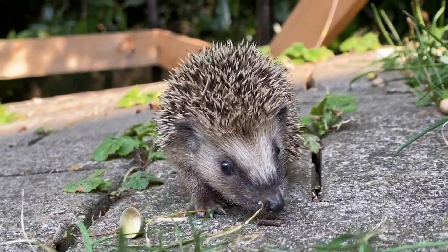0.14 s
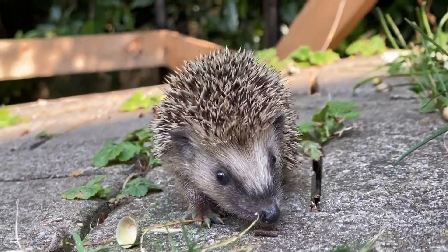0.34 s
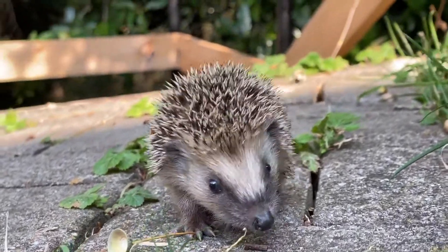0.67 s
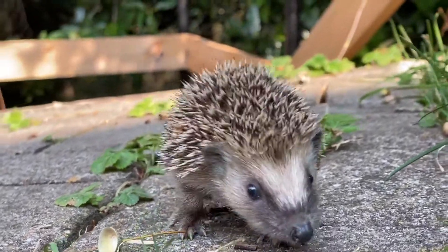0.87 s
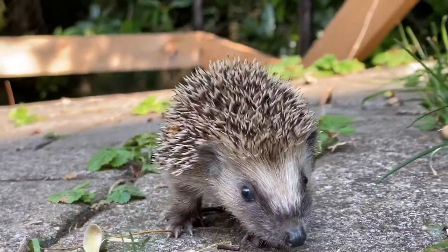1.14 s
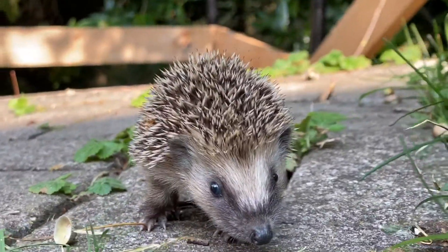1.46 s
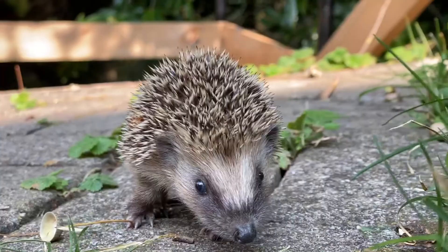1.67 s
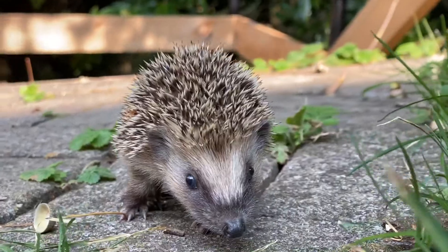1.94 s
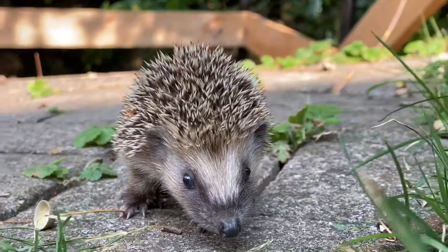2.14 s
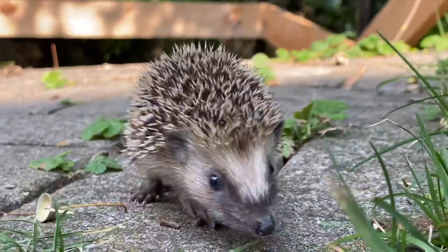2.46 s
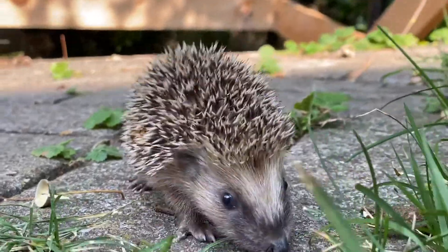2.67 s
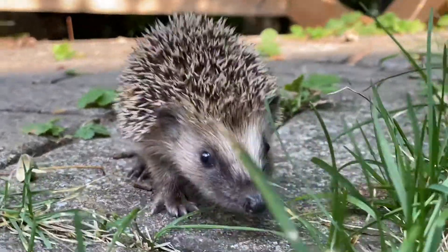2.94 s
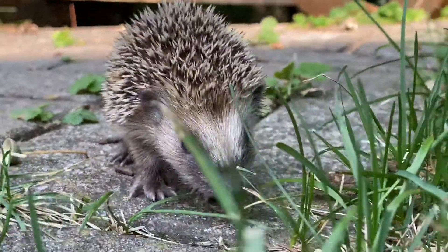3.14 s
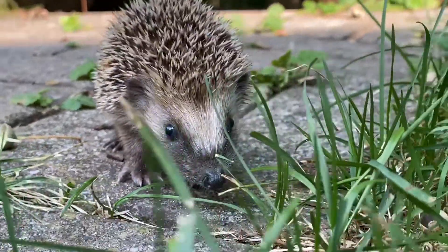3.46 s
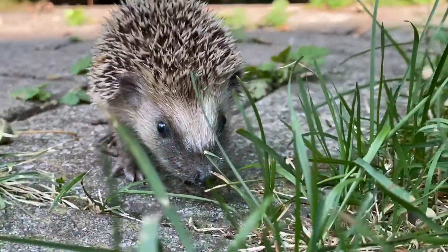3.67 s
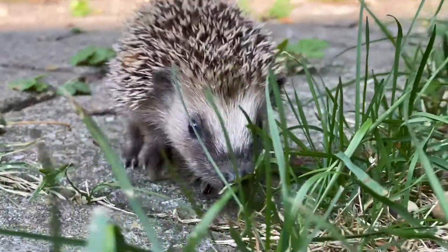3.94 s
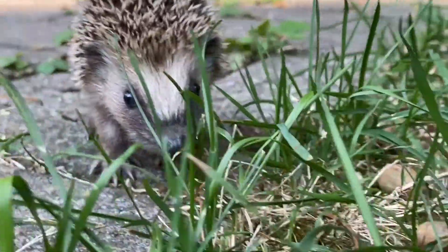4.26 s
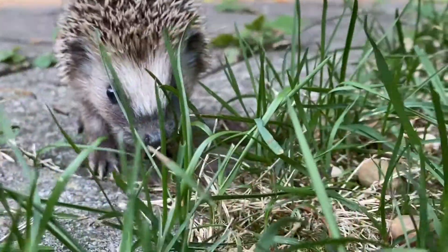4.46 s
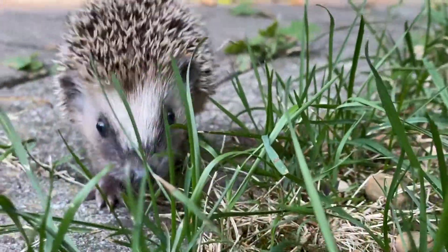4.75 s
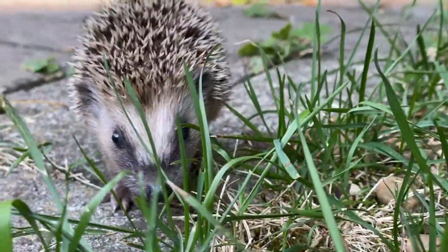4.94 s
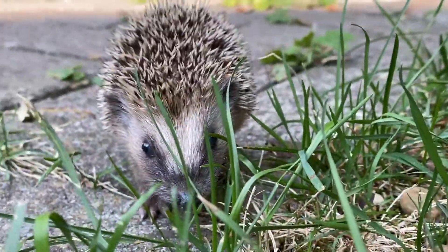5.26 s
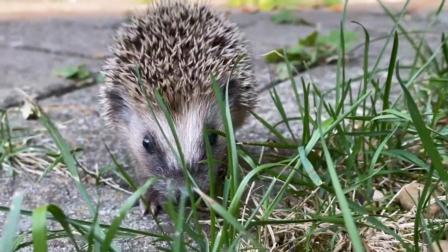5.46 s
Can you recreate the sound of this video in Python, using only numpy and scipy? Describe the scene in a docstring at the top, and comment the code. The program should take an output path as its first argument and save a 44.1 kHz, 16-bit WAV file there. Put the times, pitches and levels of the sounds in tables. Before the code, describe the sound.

Close outdoor stereo pickup of a small hedgehog on paving and grass. A few dry ticks and a faint rustle come first, then four bouts of fast, breathy sniffing puffs with softer indrawn air between many of them. Tiny scuffs accompany the second bout. Far behind, a low engine hum wavers and grows louder over soft rumble and traffic wash.

```python
"""A garden, outdoors: a young hedgehog sniffs its way over paving into grass, close to a two-port microphone.
In four bouts it puffs air out about seven times a second: shaped noise for nostrils, throat and hissing jet.
Softer draws of air lie before many puffs; dry stalks tick, blades rustle and the ground is scuffed, all in
noise bursts. Far off, wavering sine tones make an engine hum that grows louder, over rumble, roar and wash."""
import sys
import numpy as np
from scipy import signal
from scipy.fft import rfft, irfft, next_fast_len
from scipy.io import wavfile
from scipy.ndimage import map_coordinates

SR = 44100
rng = np.random.default_rng(int(sys.argv[2]) if len(sys.argv) > 2 else 0)


def generate_wav(sig):
    """Save sig (samples, or channels by samples) to the path in sys.argv[1] as 16-bit PCM at SR."""
    pcm = np.round(np.clip(np.atleast_2d(sig).T, -1, 1) * 32767).astype(np.int16)
    wavfile.write(sys.argv[1], SR, pcm)


N = 246958

# Spectra below give only the shape: each noise is brought to rms 1 before its level is set.
# low rumble in the distance, its spectrum: freq_hz [Hz], density_db [dB per Hz]
RUMBLE_SPECTRUM = [(30, -26.5), (45, -9), (58, -5.5), (80, -2.5), (115, -2.5), (155, -10.5), (260, -31.5)]
# rumble before panning: time_s [s], level_db [dB]
RUMBLE_LEVEL = [(0, -54), (.7, -54.5), (1.25, -60.5), (2.2, -57.5), (3.0, -54.5), (3.7, -55), (4.15, -51),
                (5.6, -54)]
# the engine's broad roar: freq_hz [Hz], density_db [dB per Hz]
ROAR_SPECTRUM = [(100, -17), (175, 2.5), (205, -1), (250, -3), (320, -7), (420, -7), (520, -16), (700, -30),
                 (1300, -47.5)]
# far traffic: freq_hz [Hz], density_db [dB per Hz]
WASH_SPECTRUM = [(350, -2.5), (560, 4), (800, -6.5), (1300, -16.5), (2200, -35)]
# far traffic swells: time_s [s], half_width_s [s], rise_db [dB]
WASH_SWELLS = [(.68, 0.36, 12), (2.901, .3, 4), (4.698, 0.24, 5.5)]
# faint even hiss: freq_hz [Hz], density_db [dB per Hz]
AIR_SPECTRUM = [(800, 6.5), (1800, 5), (3400, 1), (9000, -3), (12000, -4.5), (13200, -14.5)]
# far sounds, how alike the two ports are: freq_hz [Hz], likeness [-1 to 1]
FAR_ALIKE = [(70, 1), (130, 0.87), (220, 0.68), (330, 0.31), (640, 0.13), (1400, 0.57), (3000, 0.95),
             (7000, 0.89), (9000, 0.053)]
# engine's second order, before panning: time_s [s], level_db [dB]
HUM_LEVEL = [(0, -62), (.8, -56), (1.25, -59.5), (1.7, -56), (2.4, -55.5), (3.2, -48.5), (3.8, -49),
             (4.55, -45.7), (5.25, -51.5), (5.6, -45.5)]
# engine's fourth order, before panning: time_s [s], level_db [dB]
OVERTONE_LEVEL = [(0, -65), (.8, -66.5), (1.3, -70), (1.7, -60), (2.1, -63), (2.35, -74), (2.9, -63.5),
                  (3.55, -62.5), (4.8, -65), (5.3, -68.5)]
# weaker low tones, before panning: pitch_hz [Hz], first_db [dB], last_db [dB]
LOW_TONES = [(64.06, -62.5, -70), (73.6, -66, -58.5), (134.4, -63, -71)]
# engine's higher tones: pitch_hz [Hz], level_db [dB re their common level], left_lead_rad [rad]
MURMUR_TONES = [(343, -4.5, 0.4), (439, -1, 0.6), (559, -17, 1.8), (587, -14.5, 1.3)]
# common level of the higher tones, before panning: time_s [s], level_db [dB]
MURMUR_LEVEL = [(0, -82), (1.0, -79.5), (3.75, -76), (4.35, -68), (4.85, -63.5), (5.6, -68)]
# nose and feet scuff and softly bump the ground: start_s [s], length_s [s], level_db [dB], centre_hz [Hz]
SCUFFS = [(2.519, 0.042, -80.5, 1980), (2.575, 0.051, -79.5, 1250), (2.663, 0.039, -78, 2000),
          (2.707, 0.045, -83.5, 1150), (2.843, 0.032, -76.5, 2250), (5.311, .06, -86.5, 1550),
          (5.456, 0.028, -67.5, 430), (5.506, 0.03, -77, 1170), (5.511, 0.09, -82.5, 1500)]
# grass blades brush, and at 2.353 s a brief bright fizz rides on a draw: start_s [s], length_s [s], level_db
# [dB]
RUSTLES = [(0.0, 0.13, -84), (0.285, 0.044, -91), (0.128, 0.62, -94), (2.353, 0.035, -80),
           (2.832, 0.024, -74), (3.783, 0.025, -78), (5.136, 0.35, -95)]
# dry stalks snap: start_s [s], envelope_peak_db [dB]
TICKS = [(0.0289, -58.5), (0.075, -54.5), (0.102, -57), (0.1075, -59.5), (0.1597, -66), (0.3021, -62)]
# blades and stalks: freq_hz [Hz], density_db [dB per Hz]
BLADE_SPECTRUM = [(6000, -20), (9000, -8.5), (11500, -1.5), (15800, -2.5)]
# near sounds, how alike the two ports are: freq_hz [Hz], likeness [-1 to 1]
NEAR_ALIKE = [(500, 0.78), (1400, 1), (7500, 0.98), (9000, 1)]
# phase by which near sounds lead at the left port: freq_hz [Hz], left_lead_rad [rad]
PORT_LEAD = [(1900, 0.3), (3600, .65), (6000, 0.37), (7700, -1), (8200, 1), (9900, 0.93), (15800, -5)]
# the nose flares, turns and nears the paving:
# time_s [s], resonance [ratio], treble beamed at the microphone [dB], extra puff hiss [dB]
SNOUT = [(1.1, 1.043, -7, -5), (1.7, 1.03, -10, -4), (2.8, 1.03, -10, -1.5), (3.2, 1.017, -17, 0),
         (3.8, 1.01, -1, -5.5), (4.9, 1, 6, -7.5)]
# snout resonances before flaring: freq_hz [Hz], density_db [dB per Hz]
NOSTRIL_SPECTRUM = [(2000, -23.5), (2380, -9.5), (2730, -2), (3020, 1.5), (3420, -3.5), (4100, -19),
                    (5200, -28.5), (6500, -25), (7800, -33)]
THROAT_SPECTRUM = [(280, -14), (500, 11), (750, 5.5), (1270, 4), (1490, -6.5), (1780, -26.5)]
# air drawn in until the next puff: start_s [s], level_db [dB, nostril], growth_db [dB over the draw],
# hiss_db [dB re nostril]
DRAWS = [(0.597, -68.5, 4.5, -4.5), (0.696, -71.5, 4, -8), (0.841, -71, -6.5, -13), (1.013, -77, -5, -23),
         (2.331, -73, 9, -1), (2.43, -73.5, 0, -5.5), (2.568, -73, -1, -2), (2.698, -75.5, -2.5, -5.5),
         (2.838, -77, -10, -3), (3.671, -72, 1.5, -5.5), (3.81, -75, -11.5, -17.5),
         (3.968, -80.5, 2, -16.5), (4.466, -77.5, 4, -22), (4.545, -79, 8, -8.5), (4.677, -79, -4, -17),
         (4.824, -83, -3.5, -20)]
# hiss of the drawn air: freq_hz [Hz], density_db [dB per Hz]
SUCTION_SPECTRUM = [(2100, -12.5), (3800, 4.5), (4450, 3.5), (5200, -3), (6750, -1), (8200, -19),
                    (12000, -20)]
# air puffed out: start_s [s], length_s [s], level_db [dB, nostril before trim],
# openness_db [dB, throat re nostril before trims]
PUFFS = [(0.635, 0.03, -61, -3), (0.779, 0.031, -58.5, 0.5), (0.923, 0.022, -63.5, -1),
         (1.053, 0.015, -63, -4.5), (1.203, 0.018, -78, -24), (1.361, 0.0067, -73.5, -12),
         (1.718, 0.018, -70, -2), (1.878, 0.02, -70.5, -4), (2.064, 0.017, -74, -5),
         (2.243, 0.0063, -70, -17), (2.374, 0.021, -64, -8), (2.505, 0.029, -66.5, -4),
         (2.642, 0.025, -65.5, 2.5), (2.772, 0.032, -63.5, 0), (2.934, 0.035, -73.5, 7),
         (3.094, 0.013, -76.5, -16.5), (3.43, 0.012, -76.5, -4.5), (3.751, 0.03, -65.5, 4),
         (3.901, 0.035, -65, 4.5), (4.051, 0.017, -76, 8), (4.189, 0.012, -79.5, -20),
         (4.485, 0.021, -67.5, 2.5), (4.617, 0.022, -70, 7.5), (4.74, 0.02, -69.5, 7.5),
         (4.864, 0.018, -77.5, 4.5)]
# hiss of the puffed jet: freq_hz [Hz], density_db [dB per Hz]
HISS_SPECTRUM = [(2400, -8), (3650, -4), (4800, 0.5), (5600, -2), (6700, 0.5), (7400, -7.5), (8300, -21),
                 (11500, -15.5), (13500, -33)]
# top-octave fizz of the jet: freq_hz [Hz], density_db [dB per Hz]
FIZZ_SPECTRUM = [(8000, -7), (9700, 6), (11800, -2), (14200, -1), (15800, -11.5)]

TOP_HZ = 15800  # top of the sound's band
FIRING_HZ = 73.4  # the engine runs at a steady speed
WASH_DB = -81.5  # far traffic between swells, before panning
# roar at the start under an average hum, how far it follows the hum (dB per dB), and its slow gain
ROAR_DB, ROAR_FOLLOWS, ROAR_DB_PER_S = -64.5, 0.31, 1.0744
# the air stands still before a puff (s); suction narrows the nostrils and lowers their resonance (ratio)
TURN_S, DRAW_TUNE = 0.0064, 0.97


def amp(db):
    """Decibels to gain."""
    return 10 ** (np.asarray(db) / 20)


def unit(x):
    """Scaled to rms 1."""
    return x / np.sqrt(np.mean(x ** 2) + 1e-20)


def clock():
    """The time of every sample, in seconds."""
    return np.arange(N) / SR


def along(points, hz):
    """A curve through (Hz, value) points, straight on a log frequency axis."""
    freq, value = np.transpose(points)
    return np.interp(np.log(hz + 1), np.log(freq + 1), value)


def curves(rows):
    """One value per sample for each column after the time."""
    time, *columns = np.transpose(rows)
    return [np.interp(clock(), time, column) for column in columns]


def wobble(rate):
    """A smooth random curve, rate knots a second."""
    knots = rng.standard_normal(int(N * rate / SR) + 4)
    return map_coordinates(knots, [clock() * rate])


def filtered(x, response):
    """x shaped by a response of frequency, padded so that nothing wraps round to the start."""
    size = next_fast_len(N + SR // 2)
    spectrum = rfft(x, size) * response(np.fft.rfftfreq(size, 1 / SR))
    return irfft(spectrum, size)[..., :N]


def colour(pair, spectrum, alike):
    """Two unrelated signals become a stereo sound with this spectrum and left-right likeness."""
    lowest, highest = spectrum[0][0], spectrum[-1][0]

    def response(hz):
        turn = np.arccos(np.clip(along(alike, hz), -1, 1)) / 2
        skirts = np.clip(hz / lowest, 0, 1) ** 2 / np.maximum(hz / highest, 1) ** 2
        return amp(along(spectrum, hz)) * skirts * np.array([np.cos(turn), np.sin(turn)])

    mid, side = filtered(pair, response)
    return np.array([mid + side, mid - side])


def rush(spectrum, alike, grain_db=0):
    """Stereo turbulence of rms 1; grain_db breaks it into tiny crackles."""
    noise = rng.standard_normal((2, N)) * amp(grain_db * wobble(1500))
    return unit(colour(noise, spectrum, alike))


def stroke(start, length, edge):
    """A flat-topped gesture with soft edges; all times in seconds."""
    t = clock() - start
    return (1 + np.tanh(t / edge)) * (1 + np.tanh((length - t) / edge)) / 4


def outdoors(air_db=-88, pan_db=-0.5):
    """Low rumble, the engine's broad roar, a swelling wash of far traffic and a faint even hiss."""
    t = clock()
    rumble_db, = curves(RUMBLE_LEVEL)
    hum_db, = curves(HUM_LEVEL)
    roar_db = ROAR_DB + ROAR_FOLLOWS * (hum_db - hum_db.mean()) + ROAR_DB_PER_S * t
    wash_db = WASH_DB + sum(db / (1 + ((t - s) / width) ** 2) for s, width, db in WASH_SWELLS)
    rumble = amp(rumble_db) * rush(RUMBLE_SPECTRUM, FAR_ALIKE)
    roar = amp(roar_db + 1.1 * wobble(9.5)) * rush(ROAR_SPECTRUM, FAR_ALIKE)
    traffic = amp(wash_db + 1.6 * wobble(7.8)) * rush(WASH_SPECTRUM, FAR_ALIKE)
    air = amp(air_db) * rush(AIR_SPECTRUM, FAR_ALIKE)
    return (rumble + roar + traffic) * amp([[pan_db], [-pan_db]]) + air


def tone(cycles, db, lead, waver_db, drift):
    """A far sine, shaken in level and phase by the air on its way; lead is the left port's head start (rad)."""
    phase = 2 * np.pi * cycles + drift * wobble(8.8)
    gain = np.sqrt(2) * amp(db + waver_db * wobble(16))
    return gain * np.sin([phase + lead / 2, phase - lead / 2])


def engine():
    """Even orders of the firing rate make the firm hum; weaker low and unsteady higher tones join it."""
    t = clock()
    firings = FIRING_HZ * t
    hum = tone(2 * firings, curves(HUM_LEVEL)[0], lead=0.22, waver_db=0.76, drift=0.046)
    hum += tone(4 * firings, curves(OVERTONE_LEVEL)[0], lead=1.18, waver_db=1.0, drift=0.041)
    for hz, first_db, last_db in LOW_TONES:
        hum += tone(hz * t, np.linspace(first_db, last_db, N), lead=0, waver_db=2.5, drift=0.12)
    murmur_db, = curves(MURMUR_LEVEL)
    for hz, db, lead in MURMUR_TONES:
        hum += tone(hz * t, murmur_db + db, lead, waver_db=3.0, drift=0.3)
    return hum * amp([[-1.2], [1.2]])  # stronger on the right


def garden(x, t60=0.18):
    """Fence and paving scatter back a short faint tail: noise that falls 60 dB in t60 seconds."""
    t = clock()[:SR // 4]
    tail = rng.standard_normal((2, len(t))) * amp(-60 * t / t60)
    return signal.fftconvolve(x, tail / np.linalg.norm(tail[0]), axes=1)[:, :N]


def scuffs():
    """Nose and feet scuff and bump the ground: brief bands of grainy noise."""
    out = np.zeros((2, N))
    for start, length, db, hz in SCUFFS:
        band = [(hz / 2, -11), (hz, 0), (hz * 1.37, -14)]
        out += amp(db) * stroke(start, length, edge=0.0041) * rush(band, NEAR_ALIKE, grain_db=2.5)
    return out


def grass(tick_life=0.00031):
    """Blades brush in bright crackles; dry stalks snap at once and die away over tick_life seconds."""
    t = clock()
    brushing = sum(amp(db) * stroke(s, length, edge=0.0046) for s, length, db in RUSTLES)
    snaps = sum(amp(db) * (t >= s) * np.exp(-np.abs(t - s) / tick_life) for s, db in TICKS)
    rustle = brushing * rush(BLADE_SPECTRUM, NEAR_ALIKE, grain_db=4)
    return rustle + snaps * rush(BLADE_SPECTRUM, NEAR_ALIKE)


def breathy(spectrum, wander, grain_db=0, give=1, tune=1):
    """Snout air noise: resonances rise as nostrils flare (more with give) and wander as the nose twitches."""
    flare = tune * curves(SNOUT)[0] ** give
    # reading the noise faster raises its resonances
    place = np.cumsum(flare + wander * wobble(25))
    noise = rush(spectrum, NEAR_ALIKE, grain_db)
    return np.array([map_coordinates(side, [place], mode="mirror") for side in noise])


def draws(throat_db=-6.0, fizz_db=-16, hiss_swell=2.0, flutter_db=0.4, rasp_db=1.0):
    """Air drawn in ahead of a puff: softer, a fluttering nostril resonance with a hiss of suction."""
    nostril, hiss = np.zeros((2, N))
    for start, db, growth_db, hiss_db in DRAWS:
        next_puff = min(s for s, *_ in PUFFS if s > start)
        span = next_puff - TURN_S - start
        flow = amp(db) * stroke(start, span, edge=0.0064)
        swell_db = growth_db * np.clip((clock() - start) / span - 0.5, -0.5, 0.5)
        nostril += amp(swell_db) * flow
        hiss += amp(hiss_db + hiss_swell * swell_db) * flow  # the hiss changes faster than the flow
    aim_db = curves(SNOUT)[1]
    hollow = breathy(NOSTRIL_SPECTRUM, wander=0.028, grain_db=4.5, tune=DRAW_TUNE)
    hollow += amp(throat_db) * breathy(THROAT_SPECTRUM, wander=0.013)
    jet = breathy(SUCTION_SPECTRUM, wander=0.043, grain_db=1.0, give=0)
    jet += amp(fizz_db + aim_db) * rush(FIZZ_SPECTRUM, NEAR_ALIKE)
    flutter = unit(amp(flutter_db * wobble(520)))
    rasp = unit(amp(rasp_db * wobble(700)))
    return nostril * hollow * flutter + hiss * jet * rasp


def burst(start, length, sag):
    """Air pressure jumps up, fastest in the shortest puffs, then sags and is cut off."""
    u = np.maximum(clock() - start, 0)
    rise = 0.0014 + 0.14 * length
    onset = 1 - np.exp(-(u / rise) ** 2)
    return onset * np.exp(-sag * u / length) / np.sqrt(1 + (u / length) ** 7)


def puffs(full_jet_db=-68, fizz_db=-5, throat_pan_db=1):
    """Each puff sounds the nostrils, the throat behind them and a hissing jet."""
    nostril_trim_db, throat_trim_db, hiss_trim_db = 2.5, 3.0, 0.5
    hiss_per_openness = 0.48  # the more open the snout, the more it hisses (dB per dB)
    nostril, throat, hiss = np.zeros((3, N))
    for start, length, db, open_db in PUFFS:
        flow = burst(start, length, sag=0.77)
        nostril += amp(db + nostril_trim_db) * flow
        throat += amp(db + open_db + throat_trim_db) * burst(start + 0.0009, length, sag=0.5)
        # the hiss follows the flow, slightly flattened
        hiss += amp(db + hiss_per_openness * open_db + hiss_trim_db) * flow ** 0.92
    _, aim_db, extra_db = curves(SNOUT)
    hiss = hiss * amp(extra_db)
    throat = throat * amp([[throat_pan_db], [-throat_pan_db]])
    # only a fast jet reaches the top octave
    fizz = amp(fizz_db + aim_db) * hiss * np.sqrt(hiss / amp(full_jet_db))
    hollow = nostril * breathy(NOSTRIL_SPECTRUM, wander=0.035, grain_db=1.5)
    hollow += throat * breathy(THROAT_SPECTRUM, wander=0.015, grain_db=-2.5, give=2.5)
    jet = hiss * rush(HISS_SPECTRUM, NEAR_ALIKE, grain_db=4.0)
    jet += fizz * rush(FIZZ_SPECTRUM, NEAR_ALIKE, grain_db=5.0)
    flutter = amp(1.2 * wobble(190))  # moist nostrils
    return flutter * (hollow + jet)


def scene():
    """The hedgehog in front, reaching the two microphone ports out of step; the garden behind."""
    near = scuffs() + grass() + draws() + puffs()
    half_lead = np.array([[0.5], [-0.5]])
    hedgehog = filtered(near, lambda hz: np.exp(1j * along(PORT_LEAD, hz) * half_lead))
    return outdoors() + engine() + amp(-12.0) * garden(hedgehog) + hedgehog


def record(dry):
    """Nothing sounds above 15.8 kHz."""
    return filtered(dry, lambda hz: hz < TOP_HZ)


dry = scene()
out = record(dry)
generate_wav(out)
```